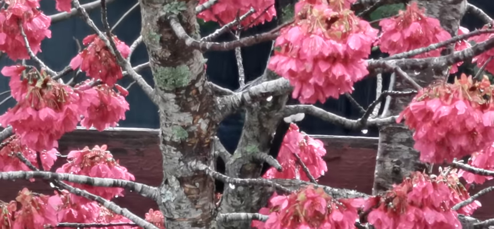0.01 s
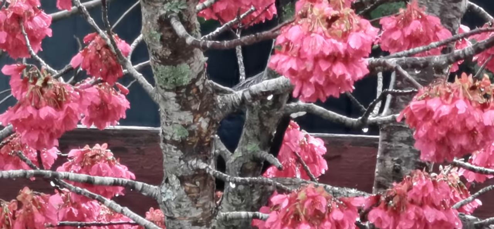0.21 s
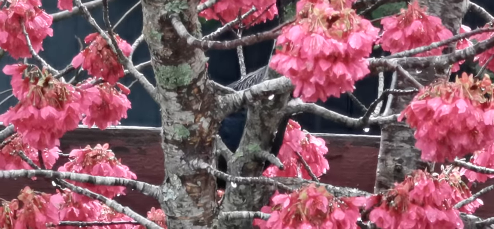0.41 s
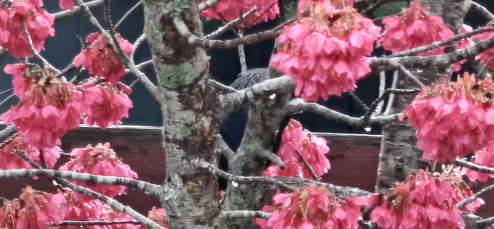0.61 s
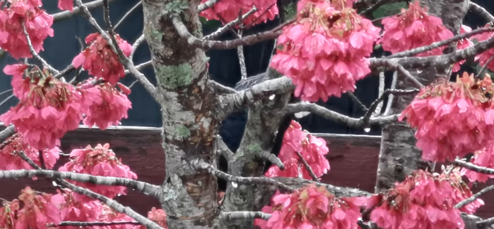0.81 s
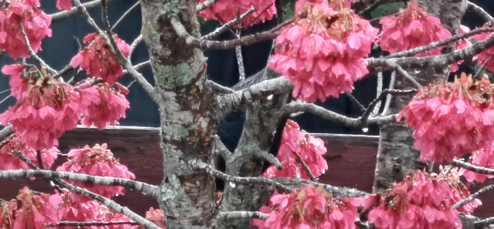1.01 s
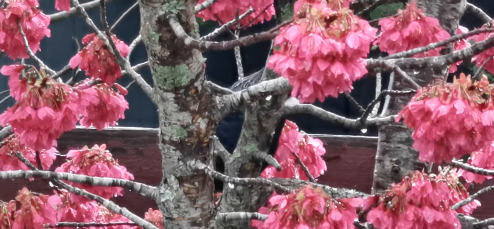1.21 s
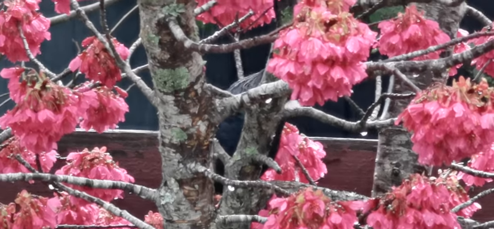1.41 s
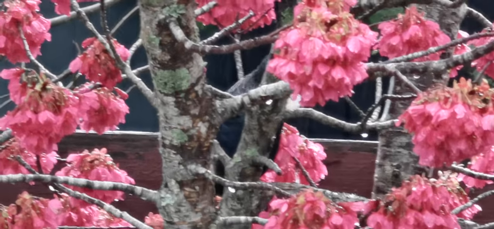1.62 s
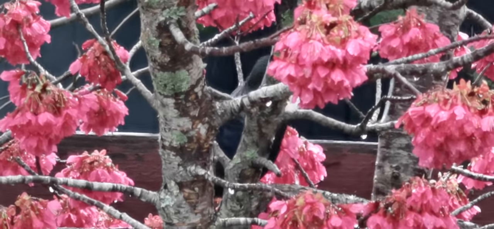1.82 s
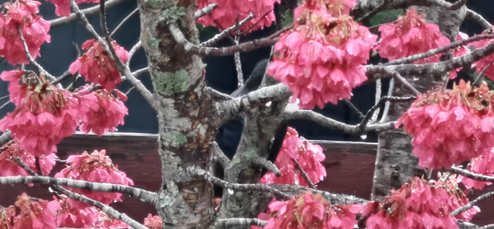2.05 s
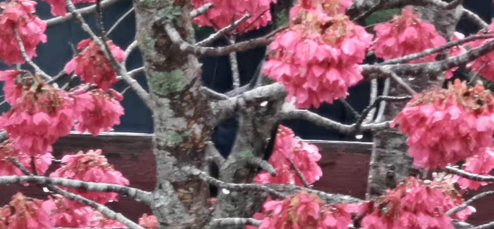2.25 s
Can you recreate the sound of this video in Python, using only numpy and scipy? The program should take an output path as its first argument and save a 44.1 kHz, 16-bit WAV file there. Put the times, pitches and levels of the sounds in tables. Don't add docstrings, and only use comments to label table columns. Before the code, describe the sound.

A songbird close on the right sings trills, rasps, rattles, clicks and bell notes over faint traffic

```python
import sys
import numpy as np
from scipy import signal
from scipy.fft import rfft, irfft, next_fast_len
from scipy.io import wavfile
from scipy.ndimage import map_coordinates

SR = 44100
rng = np.random.default_rng(int(sys.argv[2]) if len(sys.argv) > 2 else 0)


def gain_from_decibels(decibels):
    exponent = np.asarray(decibels, float) / 20
    return 10 ** exponent


def unload_wav(signal):
    wavfile.write(
        sys.argv[1],
        SR,
        np.round(np.clip(np.atleast_2d(signal).T, -1, 1) * 32767).astype(np.int16),
    )


N = 101430
T = np.arange(N) / SR

# frequency in Hz, density in dB per Hz.
RUMBLE_SPECTRUM = [(12, -45), (20, 0.5), (43, -1.5), (81, -2.5), (113, -2.5), (157, -1.5), (206, -7.5),
                   (238, -6.5), (450, -21.5), (580, -56), (990, -120)]
AIR_SPECTRUM = [(180, -34), (300, -13.5), (823, -4.5), (1170, -16), (1760, -11.5), (2450, -15.5),
                (3770, -13), (15700, -28)]
# frequency in Hz, level in dB.
ENGINE_ORDERS = [(118.4, -62.5), (161.5, -65), (199.2, -65)]

# start in s, length in s, first Hz, last Hz, level in dB, sag of last pitch in Hz per turn.
TRILL_TURN = [
    (.018, .024, 7700, 11300, -53, 600),
    (.042, .0147, 6600, 4900, -53, 0),
    (.024, .0144, 6300, 5000, -55, 0),
    (.021, .012, 7900, 8200, -57, 0),
]
TRILL_TURN_DB = [2, 5.5, 5, 3, -6]
TRILL_START_S, TRILL_PERIOD_S = -.043, .0535

# start in s, length in s, first Hz, last Hz. Then their levels in dB.
WHEEZE_NOTES = [(.598, .085, 9200, 7800), (.677, .027, 5300, 4900), (1.54, .03, 5200, 4700),
                (1.752, .03, 6600, 4900), (1.0, .07, 3600, 3800), (1.28, .15, 7400, 6900),
                (.08, .13, 8100, 8200), (1.9, .17, 5500, 5100), (-.02, .05, 9700, 9600),
                (1.93, .18, 12900, 12000), (1.935, .17, 10900, 11500), (1.93, .18, 9200, 8400),
                (1.28, .12, 8100, 7700), (0, .16, 13800, 13500), (0, .16, 11600, 11300)]
WHEEZE_LEVELS_DB = [-45.5, -45.5, -49.5, -48, -58.5, -54, -62, -61, -51.5, -57.5, -69, -61, -76, -67, -66]

# start in s, length in s, first Hz, last Hz. Then their levels in dB.
SLUR_NOTES = [(1.495, .035, 1650, 1100), (1.5, .03, 3100, 2400), (1.575, .05, 2800, 1720),
              (.432, .035, 1750, 950), (.23, .03, 1100, 1450), (1.945, .058, 5050, 6600),
              (.993, .085, 4800, 5280), (1.703, .028, 5800, 4900), (1.62, .028, 5900, 5350),
              (1.893, .05, 6100, 4650), (1.95, .12, 4850, 5350), (.793, .02, 2400, 900),
              (1.455, .055, 9600, 9150), (1.458, .105, 5700, 5880), (1.518, .022, 2600, 2150),
              (1.58, .024, 2620, 2150)]
SLUR_LEVELS_DB = [-54, -59, -43.5, -33, -47.5, -51, -41.5, -54, -65, -45.5, -61.5, -41, -50, -47, -45.5,
                  -41]
# second partial in dB, third partial in dB (where present).
SLUR_OVERTONES = [[-35, -40], [-17, -40], [-33, -37], [-32, -28], [-25, -32]] + [[-26]] * 11

# time in s, level in dB.
RASP_EFFORT = [
    (.232, -32),
    (.243, -36.5),
    (.27, -32),
    (.32, -33),
    (.42, -35.5),
    (.45, -36),
]
# centre in Hz, width in Hz, level in dB.
RASP_RESONANCES = [(1590, 140, -44), (2020, 180, 1.5), (3070, 360, -13), (4650, 1090, -8.5),
                   (5600, 210, -17.5), (7670, 670, -18.5), (8800, 390, -32), (13100, 1100, -30)]
# start in s, length in s, first Hz, last Hz. Then their levels in
# dB.
RASP_LINES = [(.255, .175, 1480, 1410), (.236, .07, 1665, 1655), (.31, .12, 1600, 1605),
              (.238, .1, 1965, 1975), (.29, .11, 2250, 2262), (.305, .1, 4850, 4850),
              (.3, .055, 2020, 2090), (.345, .06, 2085, 1985), (.395, .045, 1990, 2065),
              (.3, .13, 2160, 2165), (.395, .07, 4600, 4570), (.25, .15, 2365, 2355),
              (.24, .06, 1760, 1750), (.3, .04, 4560, 4540), (.27, .06, 6150, 6250)]
RASP_LINE_LEVELS_DB = [-42.5, -35, -39.5, -38, -36.5, -44, -37.5, -34, -32.5, -37.5, -44, -48.5, -45,
                       -44, -46]

# time in s, knock level in dB.
RATTLE_BEATS = [(0.642, -64), (.653, -62), (.664, -50.5), (.675, -46.5), (0.691, -43), (.704, -43.5),
                (.72, -41), (0.7339, -43.5), (.75, -43), (0.7653, -41.5), (.782, -43), (.797, -42.5),
                (0.815, -54), (.828, -62)]
# second partial in dB, third partial in dB.
KNOCK_OVERTONES = [-9, -5]
BEAK_OPENS_S = .7
# time in s, crack level in dB.
RATTLE_EFFORT = [
    (.7, -40),
    (.704, -36),
    (.8, -35),
    (.825, -40),
    (.84, -56),
]
# centre in Hz, width in Hz, level in dB.
RATTLE_RESONANCES = [(1640, 150, -15), (2310, 200, -6.5), (4940, 330, -8.5), (5350, 670, -2),
                     (6620, 710, -4.5), (8900, 2800, -17.5), (10300, 2800, -16.5), (13300, 2500, -14)]

# start in s, length in s, first Hz, last Hz. Then their levels in dB.
WHISTLE_NOTES = [
    (.993, .08, 6200, 6480),
    (1.43, .035, 7300, 9700),
    (1.44, .025, 5200, 5900),
    (1.668, .035, 5450, 5830),
    (2.228, .04, 6150, 5950),
    (2.268, .04, 3550, 3900),
    (.995, .07, 10800, 11500),
    (1.995, .11, 6550, 6700),
    (1.503, .025, 9150, 9500),
    (1.647, .025, 5200, 5400),
]
WHISTLE_LEVELS_DB = [-43.5, -48, -47, -52.5, -62, -52, -61, -61.5, -51.5, -64]

# time in s, level in dB.
BEAK_CLICKS = [
    (1.113, -48),
    (1.176, -38.5),
]
# centre in Hz, width in Hz, level in dB.
BEAK_RESONANCES = [(2180, 1900, 1.5), (6400, 600, 4.5), (11000, 5000, -18)]

# start in s, length in s, first Hz, last Hz. Then their levels in dB.
BELL_NOTES = [
    (1.778, .168, 2040, 2072),
    (1.698, .058, 3575, 3584),
    (1.18, .035, 1335, 1352),
    (1.137, .03, 1325, 1310),
]
BELL_LEVELS_DB = [-33, -39.5, -51.5, -54]
# second partial in dB, third partial in dB.
BELL_OVERTONES = [
    [-55, -72],
    [-15, -15],
    [-12, -2],
    [-15, -6.5],
]

# time in s, level in dB.
CHURR_EFFORT = [
    (1.27, -46),
    (1.284, -53.5),
    (1.45, -46.5),
]
# centre in Hz, width in Hz, level in dB.
CHURR_RESONANCES = [(2150, 440, 2.5), (3770, 900, -9), (5100, 880, -1), (6980, 360, 5), (11900, 4100, -10)]
# start in s, length in s, first Hz, last Hz, level in dB.
STROKE_TURN = [
    (0, .011, 3950, 3900, -53),
    (.006, .014, 3300, 1900, -55),
    (.01, .012, 8300, 7000, -55),
]
STROKE_TURN_DB = [0, 0, 0, -1, -1, 0]
STROKE_START_S, STROKE_PERIOD_S = 1.28, .0295

# start in s, length in s, first Hz, last Hz. Then their levels in dB.
SIGH_NOTES = [
    (1.905, .17, 4060, 3860),
    (1.95, .16, 4500, 4150),
    (1.918, .04, 5100, 4480),
]
SIGH_LEVELS_DB = [-57, -58.5, -60]
# second partial in dB, third partial in dB.
SIGH_OVERTONES = [
    [5.2, -4],
    [11.5, 2],
    [6, -4],
]

# start in s, length in s, first Hz, last Hz. Then their levels in dB.
RISE_NOTES = [
    (2.216, .056, 1800, 2450),
    (2.266, .034, 2450, 2300),
    (2.14, .1, 3750, 3650),
    (2.285, .03, 5200, 5600),
]
RISE_LEVELS_DB = [-57.5, -60, -86, -56]
RISE_OVERTONES = [
    [-7.5],
    [-21],
    [-34],
    [-30],
]

# frequency in Hz, t60 in s.
TREE_DECAY = [(800, 0.37), (2500, 0.38), (6000, 0.3), (14000, 0.14)]
# frequency in Hz, level in dB.
EAR_SHADOW = [(700, -3), (2000, -10), (5000, -6), (12000, -14)]


def unit(x):
    return x / np.sqrt(np.mean(x ** 2) + 1e-20)


def along(points, hz):
    f, v = np.transpose(points)
    return np.interp(np.log(hz + 1), np.log(f + 1), v)


def wobble(rate_hz):
    return map_coordinates(rng.standard_normal(int(N * rate_hz / SR) + 4), [T * rate_hz])


def filtered(x, response):
    m = next_fast_len(N + SR // 2)
    return irfft(rfft(x, m) * response(np.fft.rfftfreq(m, 1 / SR)), m)[..., :N]


def rush(spectrum, alike):
    turn = np.arccos(alike) / 2
    noise = filtered(rng.standard_normal((2, N)), lambda hz: gain_from_decibels(along(spectrum, hz)))
    mid, side = noise * [[np.cos(turn)], [np.sin(turn)]]
    return unit(np.array([mid + side, mid - side]))


def rows(shapes, levels_db):
    return [(*shape, db) for shape, db in zip(shapes, levels_db)]


def notes(rows, tones, glide, waver_hz, waver_rate, edge, fade_db=0):
    out = np.zeros(N)
    for (start_s, length_s, first_hz, last_hz, db), overtones_db in zip(rows, tones):
        u = np.clip((T - start_s) / length_s, 0, 1)
        path = (1 - np.exp(-u / glide)) / (1 - np.exp(-1 / glide))
        pitch_hz = first_hz + (last_hz - first_hz) * path + waver_hz * wobble(waver_rate)
        phase = 2 * np.pi * np.cumsum(pitch_hz) / SR
        ramp = np.clip(np.minimum(u / edge, (1 - u) / (1.86 * edge)), 0, 1)
        shape = np.sin(np.pi / 2 * ramp) ** 2
        wave = np.sin(phase)
        for k, tone_db in enumerate(overtones_db):
            wave = wave + gain_from_decibels(tone_db) * np.sin((k + 2) * phase)
        out += gain_from_decibels(db - fade_db * u + 3.5 + 1.15 * wobble(60.05)) * shape * wave
    return out


def effort(points):
    s, db = np.transpose(points)
    gate = np.clip(np.minimum(T - s[0], s[-1] - T) / 0.0065, 0, 1)
    return gain_from_decibels(np.interp(T, s, db)) * gate


def puffs(snaps, decay_s):
    return signal.lfilter([1], [1, -np.exp(-1 / (decay_s * SR))], snaps) * rng.standard_normal(N)


def pulses(rate_hz, jitter, hiss, hiss_s, scatter_db):
    k = np.arange(int(N * 250 / SR))
    chance = rng.standard_normal((len(k), 2))
    at = np.round((k + jitter * chance[:, 0]) / rate_hz * SR).astype(int)
    keep = (at >= 0) & (at < N)
    snaps = np.bincount(at[keep], gain_from_decibels(scatter_db * chance[keep, 1]), N)
    return unit(snaps) * np.sqrt(1 - hiss) + unit(puffs(snaps, hiss_s)) * np.sqrt(hiss)


def throat(x, peaks, low_hz):
    def response(f):
        ring = sum(gain_from_decibels(db) * 1j * f * w / (c * c - f * f + 1j * f * w) for c, w, db in peaks)
        return ring * (1j * f / (low_hz + 1j * f)) ** 4 / (1 + 1j * f / 8350) ** 2
    return filtered(x, response)


def background():
    tilt_db = np.array([[.7], [-.7]])
    rumble = gain_from_decibels(-55 - 1.5 + 3.14 * wobble(4.17) + tilt_db) * rush(RUMBLE_SPECTRUM, alike=0.93)
    engines = np.zeros(N)
    for hz, db in ENGINE_ORDERS:
        level = gain_from_decibels(db + 1.5 + 1.96 * wobble(5.78))
        engines += level * np.sin(2 * np.pi * np.cumsum(hz + 2.52 * wobble(8.1)) / SR)
    return rumble + engines + gain_from_decibels(-59 + 1.1 * wobble(4.6)) * rush(AIR_SPECTRUM, alike=0.22)


def trill():
    sweeps, pipes = [], []
    for k, turn_db in enumerate(TRILL_TURN_DB):
        at = TRILL_START_S + k * TRILL_PERIOD_S
        for s, length_s, first_hz, last_hz, db, sag_hz in TRILL_TURN:
            sweeps.append((at + s, length_s, first_hz, last_hz - sag_hz * k, db + turn_db))
        if k < 3:
            pipes.append((at + .053, .026, 6250, 6680, -50))
    return (notes(sweeps, [[-24]] * len(sweeps), glide=0.38, waver_hz=324, waver_rate=1200, edge=0.23)
            + notes(pipes, [[-14]] * len(pipes), glide=0.33, waver_hz=30, waver_rate=270, edge=0.099))


def wheezes():
    return notes(rows(WHEEZE_NOTES, WHEEZE_LEVELS_DB), [[-30]] * 15,
                 glide=1.4, waver_hz=491, waver_rate=2500, edge=0.11)


def slurs():
    return notes(rows(SLUR_NOTES, SLUR_LEVELS_DB), SLUR_OVERTONES,
                 glide=0.794, waver_hz=35.5, waver_rate=400, edge=0.2)


def rasp():
    snaps = pulses(185.8, jitter=.12, hiss=.67, hiss_s=.011, scatter_db=1.1)
    voice = throat(snaps, RASP_RESONANCES, low_hz=920)
    voice = unit(signal.sosfilt(signal.butter(6, 1290, "high", fs=SR, output="sos"), voice))
    held = notes(rows(RASP_LINES, RASP_LINE_LEVELS_DB), [[-30]] * 15,
                 glide=1.33, waver_hz=14.45, waver_rate=150, edge=0.094)
    return voice * effort(RASP_EFFORT) + held


def knocks():
    pitch_hz, length_s, closed_db = 775, .0115, 18
    beats = [(s, length_s, 1.03 * pitch_hz, pitch_hz, db) for s, db in RATTLE_BEATS]
    tones = [np.array(KNOCK_OVERTONES) - closed_db * (s < BEAK_OPENS_S) for s, db in RATTLE_BEATS]
    return notes(beats, tones, glide=.5, waver_hz=24.96, waver_rate=140, edge=0.19)


def rattle():
    snaps = np.zeros(N)
    for s, db in RATTLE_BEATS:
        snaps[round(s * SR)] = (s > BEAK_OPENS_S) * gain_from_decibels(1.4 * rng.standard_normal())
    source = 0.39 * unit(snaps) + unit(puffs(snaps, 0.0098))
    crack = throat(source, RATTLE_RESONANCES, low_hz=870)
    sounding = (T > BEAK_OPENS_S) & (T < RATTLE_EFFORT[-1][0])
    return crack / np.sqrt(np.mean(crack[sounding] ** 2)) * effort(RATTLE_EFFORT)


def whistles():
    return notes(rows(WHISTLE_NOTES, WHISTLE_LEVELS_DB), [[-30]] * 10,
                 glide=0.206, waver_hz=50, waver_rate=73, edge=0.068)


def clicks():
    taps = np.zeros(N)
    for s, db in BEAK_CLICKS:
        taps[round(s * SR)] = gain_from_decibels(db + 18.5)
    return throat(taps, BEAK_RESONANCES, low_hz=900)


def bells():
    return notes(rows(BELL_NOTES, BELL_LEVELS_DB), BELL_OVERTONES,
                 glide=0.12, waver_hz=3.6, waver_rate=40, edge=0.26, fade_db=6)


def churr():
    grain = pulses(69, jitter=.25, hiss=.985, hiss_s=.009, scatter_db=1.5)
    voice = unit(throat(grain, CHURR_RESONANCES, low_hz=1120)) * effort(CHURR_EFFORT)
    strokes = []
    for k, turn_db in enumerate(STROKE_TURN_DB):
        at = STROKE_START_S + k * STROKE_PERIOD_S
        for s, length_s, first_hz, last_hz, db in STROKE_TURN:
            strokes.append((at + s, length_s, first_hz, last_hz, db + turn_db))
    return voice + notes(strokes, [[-30]] * len(strokes), glide=0.79, waver_hz=60, waver_rate=600, edge=0.22)


def sigh():
    return notes(rows(SIGH_NOTES, SIGH_LEVELS_DB), SIGH_OVERTONES,
                 glide=2.74, waver_hz=32.5, waver_rate=500, edge=0.28)


def rises():
    return notes(rows(RISE_NOTES, RISE_LEVELS_DB), RISE_OVERTONES,
                 glide=-1.04, waver_hz=21, waver_rate=300, edge=0.18)


def trees(x):
    hz, t, z = signal.stft(rng.standard_normal((2, SR // 2)), SR, nperseg=256)
    decay = gain_from_decibels(-60 * t / along(TREE_DECAY, hz)[:, None])
    tail = signal.istft(z * decay, SR, nperseg=256)[1]
    delayed = np.pad(x, (300, 0))[None]
    return signal.fftconvolve(delayed, tail / np.linalg.norm(tail[0]), axes=1)[:, :N]


def left_ear(bird):
    def response(hz):
        lag_s = 0.0004532 / (1 + (1050 / (hz + 1)) ** 8)
        return gain_from_decibels(along(EAR_SHADOW, hz)) * np.exp(-2j * np.pi * hz * lag_s)
    return filtered(bird, response)


def scene():
    bird_db, wet_db, wet_left_db, pure_wet_db = 3.5, -4.5, -2.5, -11
    pure = gain_from_decibels(bird_db) * (knocks() + bells())
    rest = trill() + wheezes() + slurs() + rasp() + rattle() + whistles() + clicks() + churr() + sigh() + rises()
    rest = gain_from_decibels(bird_db) * rest
    bird = pure + rest
    echoes = gain_from_decibels([[wet_db + wet_left_db], [wet_db]]) * trees(rest + gain_from_decibels(pure_wet_db) * pure)
    return np.array([left_ear(bird), bird]) + echoes + background()


def roll_off(x):
    return signal.sosfilt(signal.butter(12, 15820, fs=SR, output="sos"), x)


def record(dry):
    mix = filtered(dry, lambda hz: hz < 15830)
    return roll_off(mix)


dry = scene()
out = record(dry)
unload_wav(out)
```